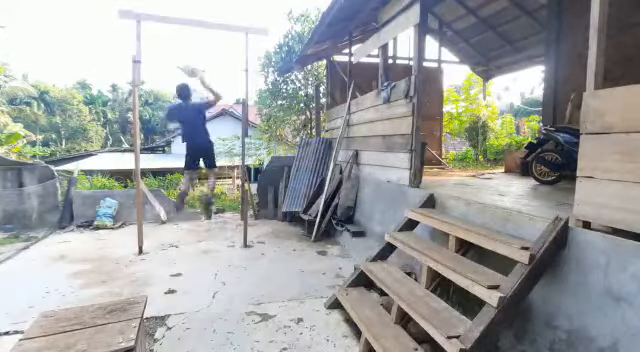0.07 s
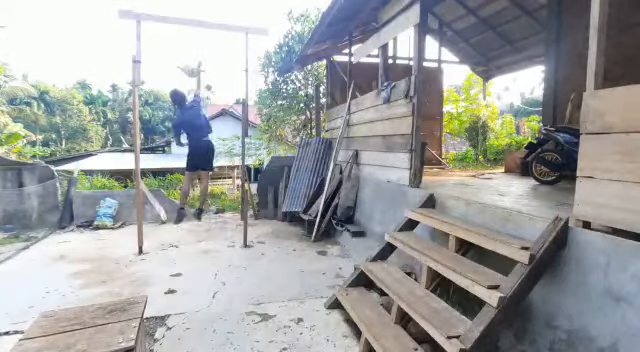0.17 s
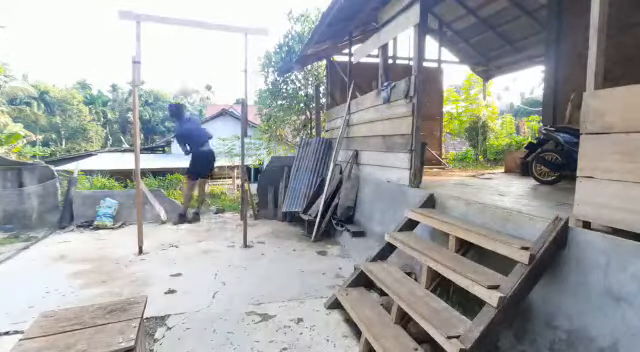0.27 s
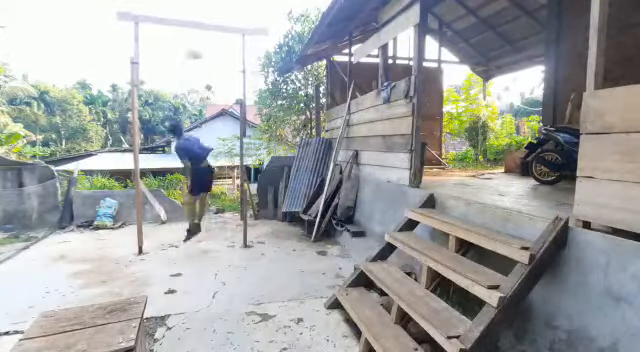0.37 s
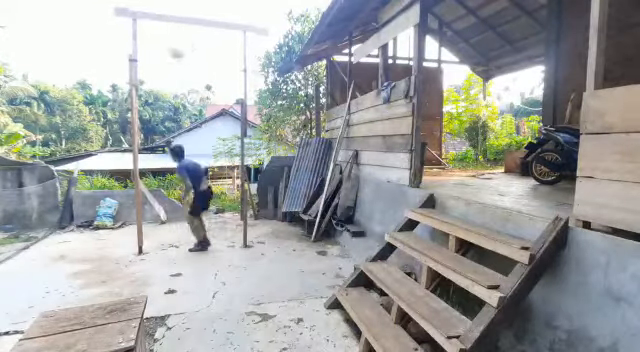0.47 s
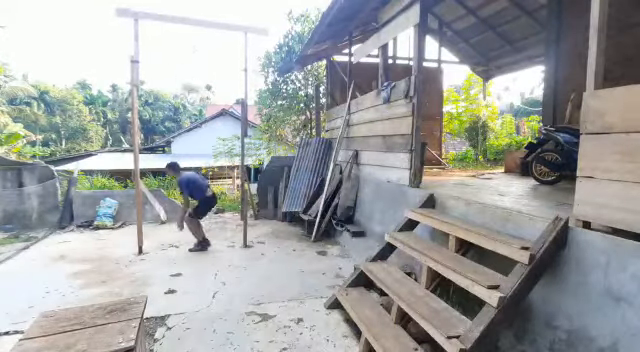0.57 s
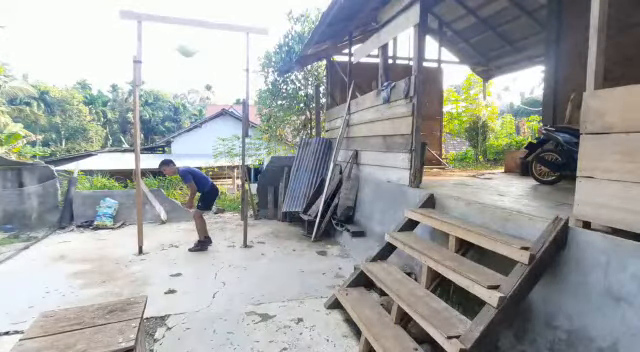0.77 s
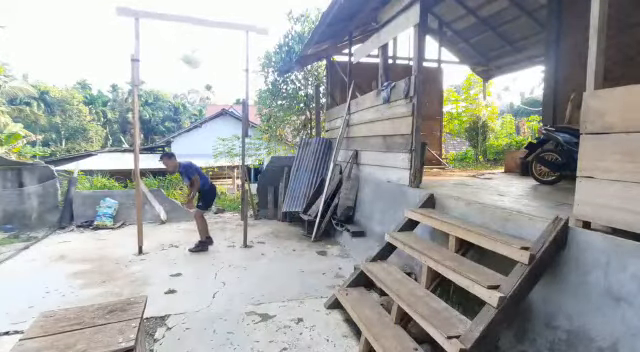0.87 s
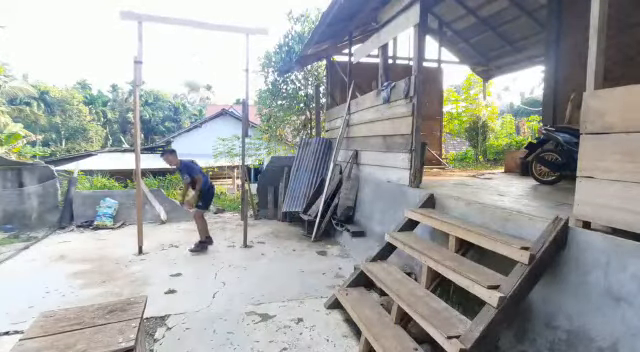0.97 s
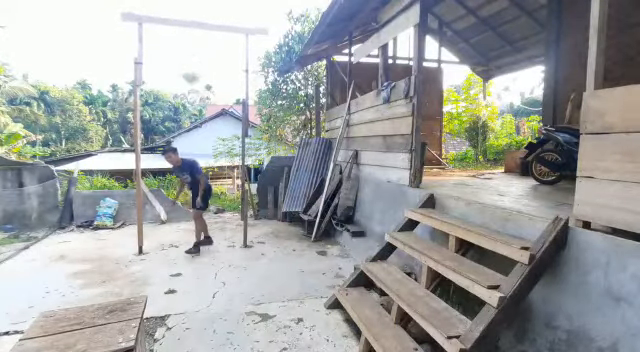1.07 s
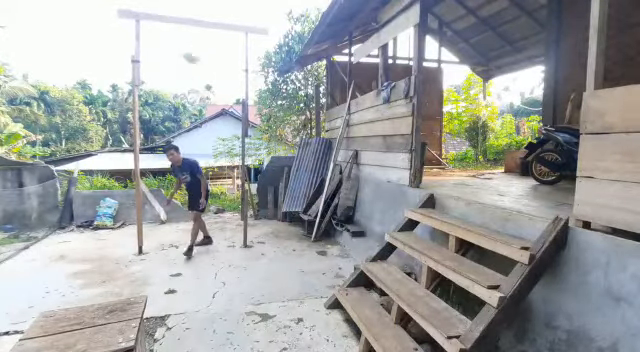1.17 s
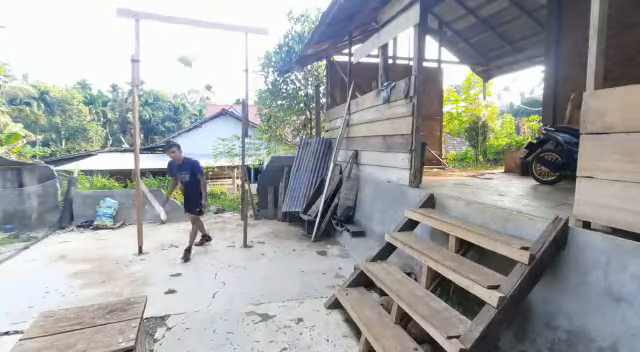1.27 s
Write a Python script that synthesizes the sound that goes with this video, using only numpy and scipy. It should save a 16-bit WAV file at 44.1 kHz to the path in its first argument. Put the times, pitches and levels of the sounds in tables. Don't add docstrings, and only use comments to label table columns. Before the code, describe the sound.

A loud hollow slap on an inflated ball, then a landing thud and gritty shoe scrapes, then two clustered ball knocks further off, in an echoing concrete yard with a faint distant motor, on a stereo phone.

```python
import sys
import numpy as np
from scipy import signal
from scipy.fft import rfft, irfft
from scipy.io import wavfile
from scipy.ndimage import uniform_filter1d

SR = 44100
rng = np.random.default_rng(int(sys.argv[2]) if len(sys.argv) > 2 else 0)


def transcribe(signal):
    frames = np.atleast_2d(signal).T
    limited = np.clip(frames, -1, 1)
    pcm = np.round(limited * 32767).astype(np.int16)
    wavfile.write(sys.argv[1], SR, pcm)


def elevation(decibels):
    levels = np.asarray(decibels, float)
    return 10 ** (levels / 20)


N = 57330
T = np.arange(N) / SR
HZ = np.fft.rfftfreq(2 * N, 1 / SR) + 1e-3


def curve(points):
    p = np.array(points, float)
    return np.interp(np.log(HZ), np.log(p[:, 0]), p[:, 1])


def shape(x, gain):
    return irfft(rfft(x, 2 * N) * gain, 2 * N)[..., :N]


def unit(x):
    return x / np.sqrt(np.mean(x ** 2))


def pair(x, other):
    # f/Hz, level/dB
    apart = [(100, -19.5), (300, -12), (700, -5.5), (1500, -1), (16000, 1)]
    side = shape(other, elevation(curve(apart)))
    return np.array([x + side, x - side])


def ring(s, hz, t60, rise_s):
    t = np.clip(T - s, 0, None)
    return -np.sin(2 * np.pi * hz * t) * (1 - np.exp(-t / rise_s)) * elevation(-60 * t / t60)


def walk(rate):
    k = int(SR / rate)
    steps = np.repeat(rng.standard_normal(N // k + 1), k)
    return 1.63 * uniform_filter1d(uniform_filter1d(steps, k), k)[:N]


def click(s, points):
    fold = irfft(curve(points) * np.log(10) / 20, 2 * N)
    fold[1:N] = 2 * fold[1:N]
    fold[N + 1:] = 0
    x = irfft(np.exp(rfft(fold) - 2j * np.pi * HZ * s), 2 * N)[:N]
    return x / np.sqrt(np.sum(x ** 2))


def far():
    # f/Hz, level/dB (per Hz)
    far_colour = [(25, -65), (140, 1.5), (210, -22), (320, -21), (600, -38.5), (3300, -57), (4200, -70),
                  (16500, -74.5)]
    # t/s, level/dB
    far_swell = [ [(0.0, -44), (0.108, -45), (0.292, -40.5), (0.748, -60.5), (0.908, -78), (1.068, -41.5),
                 (1.3, -81)], ][0]
    # f/Hz, width/Hz, level/dB
    drone_bands = [(72, 54, -50), (129.3, 24, -56), (195, 60, -64.5), (301, 20, -63.5), (2870, 21, -81)]

    def peak(hz, width):
        return 1 / (1 + ((HZ - hz) / width * 2) ** 2)

    noise = pair(*rng.standard_normal((2, N)))
    colour = elevation(curve(far_colour))
    low = 1 / (1 + (HZ / 333) ** 4)
    swell_db = np.interp(T, *np.array(far_swell).T)
    rumble = unit(shape(noise, colour * low)) * elevation(swell_db - 2.0)
    drone = 0
    for hz, width, db in drone_bands:
        drone = drone + unit(shape(noise, peak(hz, width))) * elevation(db + 0.5 * walk(18.0))
    air = unit(shape(noise, colour * (1 - low))) * elevation(-53 + 1.95 * walk(11.36))

    hum_swell = 1 + 0.58 * np.cos(2 * np.pi * 1.346 * (T - 0.17))
    hum = elevation(-52) * hum_swell * np.sin(2 * np.pi * 297.2 * T + 1.48 * walk(12))

    throb = (1 + 0.42 * np.sin(2 * np.pi * 40.2 * T)) * (0.46 + np.exp(-T / 0.73))
    cricket = unit(shape(noise, peak(7250, 600) ** 2)) * throb * elevation(-83)
    return rumble + drone + hum + air + cricket


def shoes():
    scuff_starts = [.160, .452, .61, .764, .795, .992, 1.035, 1.18, 1.208, 1.247]
    # rise/s, hold/s, level/dB, brightness/(dB per octave)
    scuffs = [(0.0034, 0.012, -86, 5), (0.0019, 0.038, -37, 1), (0.06, 0.012, -45.5, 0.5),
              (0.009, 0.021, -46.5, 2), (0.022, 0.028, -50.5, 2.5), (0.026, 0.0099, -41.5, -1),
              (0.018, 0.025, -57.5, 7.5), (0.0011, 0.026, -53.5, 0.5), (0.0054, 0.0068, -51, 15.5),
              (0.0025, 0.011, -57, 11.5)]
    # f/Hz, level/dB (per Hz)
    grit_colour = [(240, -13), (450, 1), (900, -0.5), (1600, -4.5), (4000, -16), (8000, -22.5),
                   (16500, -26.5)]
    # t/s, peak level/dB, f/Hz, t60/s
    pebbles = [(.766, -39, 4200, .009), (.7755, -34, 3800, .011), (.812, -40, 3900, .01),
               (.82, -41, 6400, .012), (.832, -41, 4500, .012), (.806, -43, 5500, .012),
               (.4519, -33, 3800, .005)]
    # t/s, level/dB, low f/Hz, high f/Hz
    ticks = [(.1655, -58, 4000, 8000), (.4518, -31, 2800, 9000), (.452, -46, 11000, 16500),
             (.512, -45, 11500, 15500), (.766, -45, 3700, 4500), (.7756, -44, 6500, 8000),
             (.7765, -47, 6000, 12000), (.869, -53, 12000, 15500), (1.2442, -41, 9000, 17000),
             (1.215, -55, 13500, 15500)]
    # t/s, peak level/dB, f/Hz, t60/s
    thuds = [(0.457, -33.5, 74.9, 0.38), (0.47, -21.5, 114, 0.052), (0.468, -26.5, 290, 0.036),
             (0.262, -22, 100, 0.19), (0.701, -36, 110, 0.074), (0.789, -39.5, 117, 0.2),
             (0.883, -34.5, 70.3, 0.66), (0.945, -33, 72, 0.34), (0.996, -43, 1100, 0.027),
             (1.084, -39, 64, 0.31), (1.182, -44.5, 1200, 0.067)]

    grains = (rng.random((2, N)) < 9000 / SR) * rng.standard_normal((2, N))
    grains = pair(*(grains * elevation(1.0 * rng.exponential(size=(2, N)))))
    out = 0
    for s, (rise_s, hold_s, db, tilt_db) in zip(scuff_starts, scuffs):
        release = np.exp(-np.clip(T - s - rise_s - hold_s, 0, None) / 0.032)
        env = np.clip((T - s) / rise_s, 0, 1) * release
        tilt = tilt_db * np.log2(np.clip(HZ, 300, None) / 4000)
        grit = unit(shape(grains, elevation(curve(grit_colour) + tilt)))
        out = out + elevation(db + 1.03 * walk(80.1)) * env * grit
    for s, db, hz, t60 in pebbles:
        out = out + elevation(db) * ring(s, hz, t60, 0.0002)
    snap = rng.standard_normal(N)
    for s, db, low_hz, high_hz in ticks:
        band = 1 / (1 + (low_hz / HZ) ** 12) / (1 + (HZ / high_hz) ** 12)
        fade = elevation(db - 60 * abs(T - s) / 0.005) * (T > s)
        out = out + fade * unit(shape(snap, band))
    for s, db, hz, t60 in thuds:
        out = out + elevation(db) * ring(s, hz, t60, 0.5 / hz)
    return out


def slap():
    # f/Hz, level/dB, t60/s
    slap_modes = [(103, -35, 0.12), (141.3, -3.5, 0.16), (187.6, 0.5, .045), (235, -1, 0.067),
                  (265, -11.5, 0.12), (320, -28, 0.04), (486, -1.5, 0.022), (587, -17.5, 0.029),
                  (733, -3.5, 0.048), (830, 0, 0.017), (927, -5, 0.093), (1028, -9.5, 0.041),
                  (1320, -10, 0.054), (1880, -8.5, 0.048)]
    # f/Hz, level/dB (per Hz)
    crack_colour = [(500, -32), (900, -17), (2000, -20.5), (4500, -35.5), (7500, -35.5), (13000, -52),
                    (16500, -40)]
    # f/Hz, level/dB (per Hz)
    slap_spread = [(180, -39), (300, -9.5), (456, -16.5), (780, -9), (1200, -13), (2520, -21.5),
                   (6000, -36), (16500, -43.5)]
    slap_s = 0.2095

    def hit(s, modes):
        total = 0
        for hz, db, t60 in modes:
            inside_air = hz < 400
            start = s + 0.00097 * inside_air
            total = total + elevation(db) * np.sign(hz - 400) * ring(start, hz, t60, 0.00056)
        return total

    body = hit(slap_s, slap_modes) + elevation(-4.5) * hit(slap_s + 0.0268, slap_modes[1:6])
    body = body * elevation(-9)

    t = T - slap_s
    env = (t > 0) * (1 - np.exp(-abs(t) / 0.001)) * elevation(-60 * abs(t) / 0.035)
    hiss = pair(*rng.standard_normal((2, N)))
    crack = unit(shape(hiss, elevation(curve(crack_colour)))) * env * elevation(-17.5)

    snap_s = slap_s + 0.0017 + 7e-6 * np.array([[1], [-1]])
    finger_snap = elevation(-13) * ring(snap_s, 12750, 0.003, 0.00019)
    return body, crack + finger_snap, elevation(7) * click(slap_s, slap_spread)


def after_rings():
    # t/s, peak level/dB, f/Hz, t60/s
    ring_events = [(.242, -19, 740, 0.058), (.23, -23, 141, 0.095), (0.25, -23, 1060, 0.052),
                   (.262, -22.5, 257, 0.074), (.277, -21.5, 268, 0.11), (.24, -26, 235, .08),
                   (0.27, -30, 1100, 0.12), (0.32, -21.5, 140, 0.13), (.6678, -8, 279, 0.026),
                   (.6648, -19.5, 614, 0.014), (.6725, -15, 1106, 0.026), (.6762, -9.5, 707, 0.018),
                   (.669, -20, 160, 0.042), (.674, -25, 1410, 0.065), (.69, -28, 770, .05),
                   (.705, -26, 288, 0.057), (.686, -33, 1890, 0.086), (.712, -34.5, 2100, 0.076),
                   (.678, -26, 2100, .025), (0.691, -26.5, 167.5, 0.12), (.694, -25, 520, 0.075),
                   (0.72, -36, 1036, 0.042), (.722, -28.5, 330, 0.068), (0.78, -46, 1500, 0.07),
                   (1.0214, -10, 274, 0.0435), (1.0185, -21, 646, .025), (1.022, -27.5, 1300, 0.052),
                   (1.0245, -16, 442, 0.044), (1.0265, -16.5, 745, 0.031), (1.029, -22.5, 1120, 0.034),
                   (1.03, -31, 1700, 0.054), (1.048, -37, 2250, 0.044), (1.02, -23, 160, .04),
                   (1.031, -26, 2115, 0.037), (1.04, -34, 720, 0.18), (1.048, -31.5, 530, 0.098),
                   (1.045, -27, 139.6, 0.066), (0.46, -36.5, 1003, 0.055), (.470, -38, 600, .04),
                   (0.52, -32.5, 112, 0.12), (0.52, -30, 326, 0.048)]
    return sum(elevation(db) * ring(s, hz, t60, 0.65 / hz) for s, db, hz, t60 in ring_events)


def knocks():
    knock_times = [.6655, .669, .673, .6765, 1.017, 1.0215, 1.026, 1.031]
    # level/dB, contact time/s, brightness/(dB per octave)
    contacts = [(-24.5, 0.00088, -3.5), (-21.5, 0.0022, 3), (-30.5, 0.0012, 7), (-35.5, .001, 4),
                (-34.5, 0.0014, 0), (-29, 0.0015, -6), (-26.5, 0.00075, -4), (-28, 0.00036, 8.5)]
    # f/Hz, level/dB, t60/s
    knock_modes = [(147, -7.5, 0.035), (194, 0.5, 0.012), (226, 4, 0.023), (284, 8.5, 0.049),
                   (440, 7, 0.025), (520, 13, 0.015), (630, 8, 0.034), (710, 7, 0.024), (990, -1, 0.0081),
                   (1080, 12, 0.0087), (1200, 5, 0.0079), (1403, -5, 0.035), (1790, -2, 0.02),
                   (2105, 2, 0.022)]
    # f/Hz, level/dB (per Hz)
    knock_spread = [(71, -20), (120, 6), (181, -16.5), (445, -3.5), (515, -5), (680, -8.5), (1060, -2),
                    (6000, -43.5), (7800, -49), (13200, -120)]

    grid_shape = (len(contacts), len(knock_modes))
    chance = rng.standard_normal(grid_shape)
    late_s = 0.002 * rng.random(grid_shape)
    rasp_colour = curve([(1500, 6), (2800, -6), (6000, -29), (16000, -31)])
    rasp = unit(shape(rng.standard_normal(N), elevation(rasp_colour)))
    out, spread = 0, 0
    for s, (level_db, contact_s, tilt_db), row, lag in zip(knock_times, contacts, chance, late_s):
        for (hz, db, t60), c, d in zip(knock_modes, row, lag):
            mode_db = level_db - 15 + db + tilt_db * np.log2(hz / 600) + 3 * c
            out = out + elevation(mode_db) * ring(s + d, hz, t60, contact_s)
        fade = elevation(level_db - 12.5 - 60 * abs(T - s) / 0.031)
        out = out + fade * rasp * np.clip((T - s) / contact_s, 0, 1)
        spread = spread + elevation(level_db + 23.5) * click(s, knock_spread)
    return out, spread


def yard(gap_s, fill_s, share=1):
    # f/Hz, t60/s
    yard_t60 = np.array([(80, 0.12), (300, 0.39), (1000, 0.4), (3000, 0.5), (8000, 0.57), (16000, 0.3)])
    noise = rng.standard_normal((2, N)) * elevation(1.26 * walk(144))
    out = 0
    for hz in 40 * 2. ** np.arange(10):
        band = np.clip(1 - abs(np.log2(HZ / hz)), 0, 1)
        t60 = np.interp(np.log(hz), np.log(yard_t60[:, 0]), yard_t60[:, 1])
        out = out + shape(noise, band) * elevation(-60 * T / t60 / share)
    fill = 1 - np.exp(-np.clip(T - gap_s, 0, None) / fill_s)
    out = rfft(pair(*(out * fill)), 2 * N)
    return out / np.sqrt(uniform_filter1d(abs(out) ** 2, size=120))


def scene():
    body, crack, slap_sent = slap()
    knock, knock_sent = knocks()
    feet = shoes()
    near = elevation(-11) * body + slap_sent + elevation(-12.5) * feet[0]
    across = elevation(-8.5) * knock + knock_sent
    near_echo = shape(near, yard(0.0011, 0.008))
    across_echo = shape(across, yard(0.0057, 0.0034, 0.62))
    return body + crack + knock + after_rings() + feet + near_echo + across_echo + far()


def roll_off(x):
    return signal.sosfilt(signal.butter(12, 16740, fs=SR, output="sos"), x)


def record(dry):
    # f/Hz, level/dB
    mic_tone = [(7800, 0.5), (9600, -5), (13000, -1), (15500, -2.5), (15900, -24), (17000, -44)]
    # f/Hz, level/dB
    left_over_right = [(60, 2), (250, 2), (700, 4.5), (1290, 5.5), (2380, 7), (4400, 2), (8120, -1),
                       (15000, 2)]
    side = np.array([[1], [-1]])
    lead = np.exp(1j * np.pi * side * HZ * 0.00019)
    ports = elevation(curve(mic_tone) + side * curve(left_over_right) / 2) * lead
    bass_cut = signal.butter(6, 46, "high", fs=SR, output="sos")
    cut = signal.sosfilt(bass_cut, shape(dry, ports))
    mix = np.tanh(0.7 * cut) / 0.7
    return roll_off(mix)


dry = scene()
out = record(dry)
transcribe(out)
```